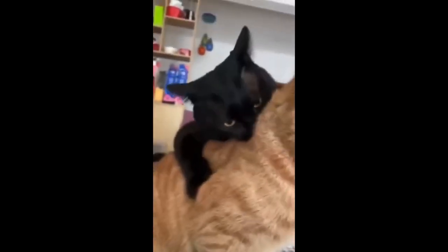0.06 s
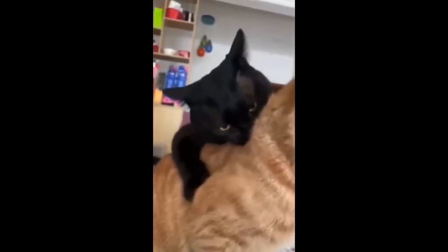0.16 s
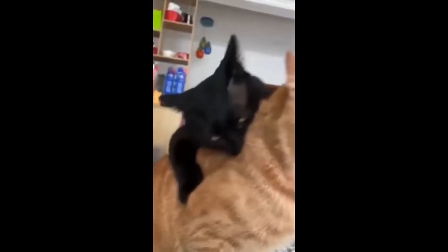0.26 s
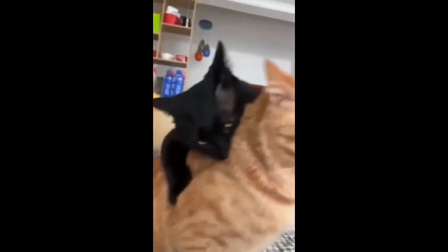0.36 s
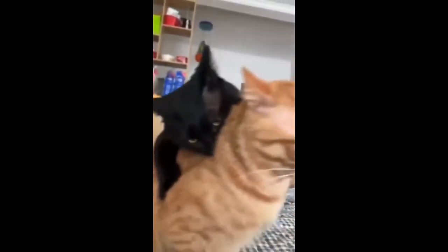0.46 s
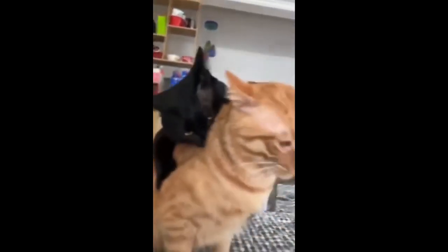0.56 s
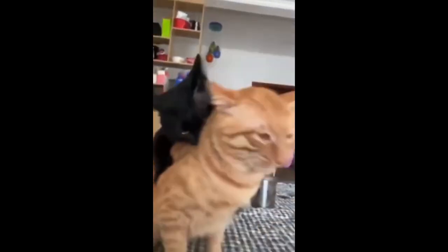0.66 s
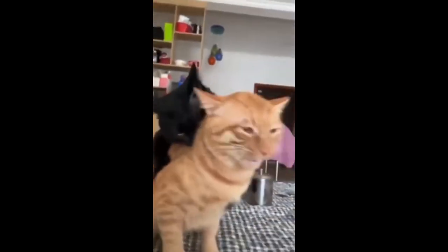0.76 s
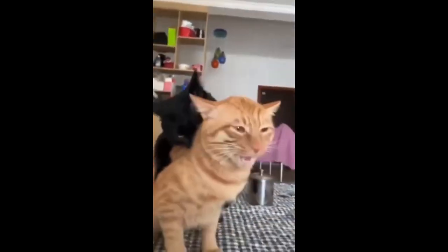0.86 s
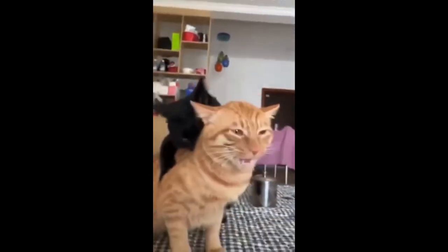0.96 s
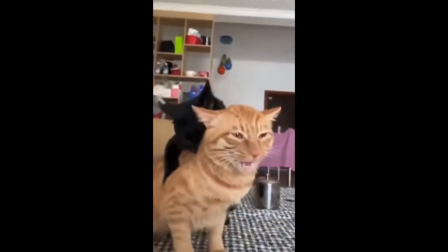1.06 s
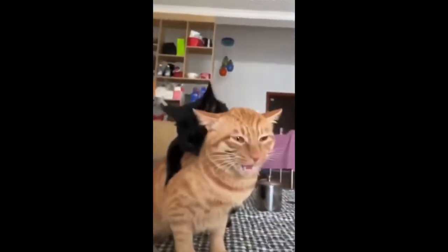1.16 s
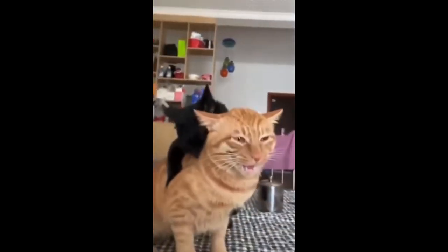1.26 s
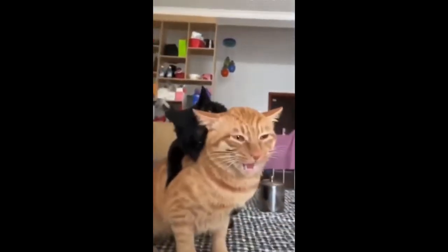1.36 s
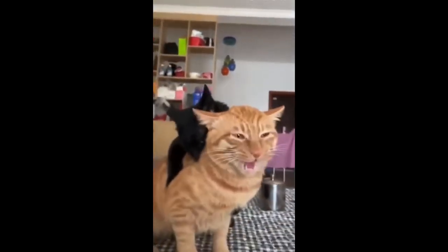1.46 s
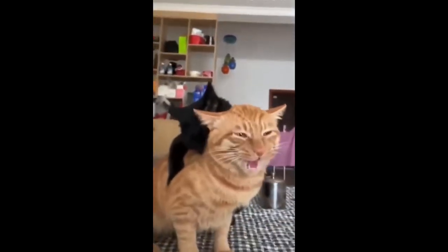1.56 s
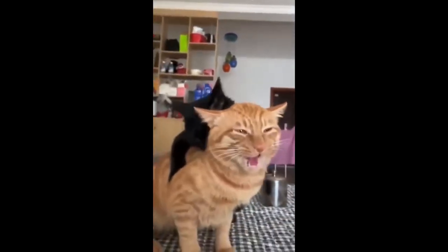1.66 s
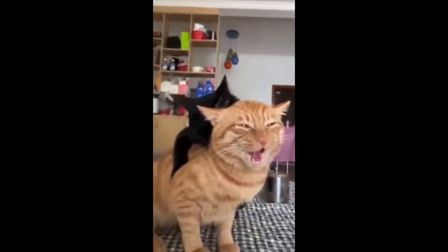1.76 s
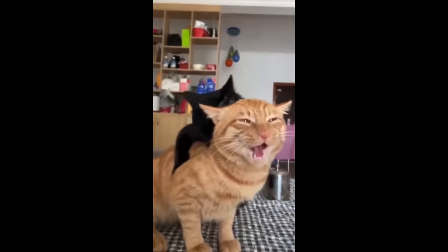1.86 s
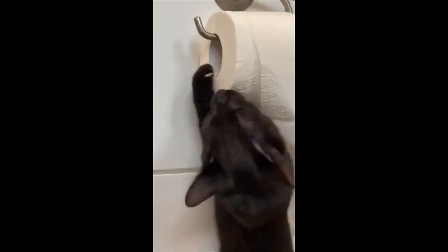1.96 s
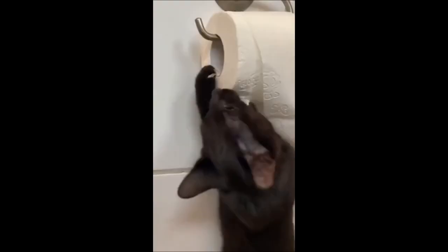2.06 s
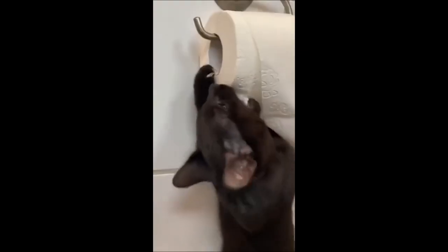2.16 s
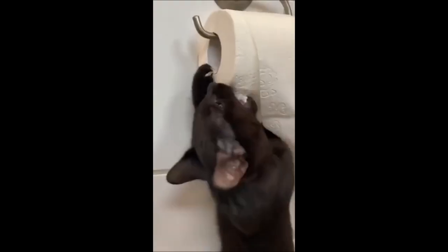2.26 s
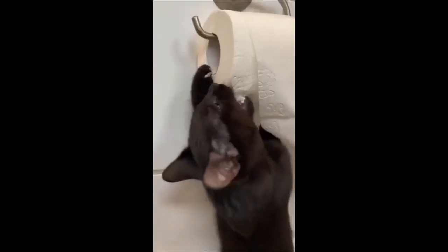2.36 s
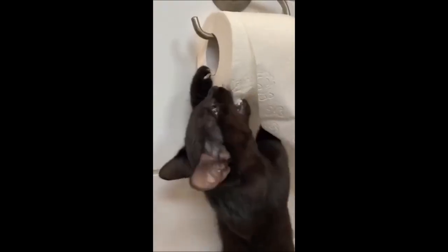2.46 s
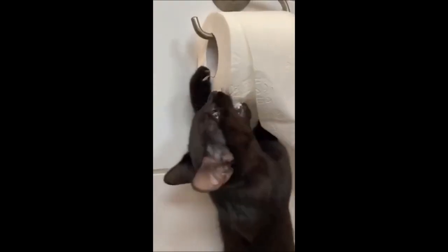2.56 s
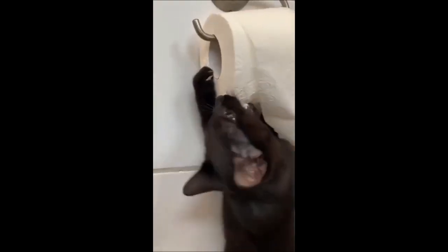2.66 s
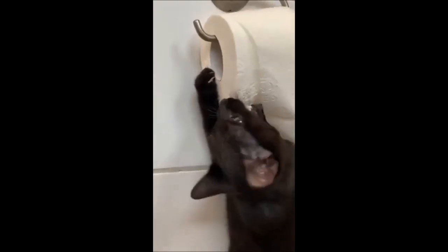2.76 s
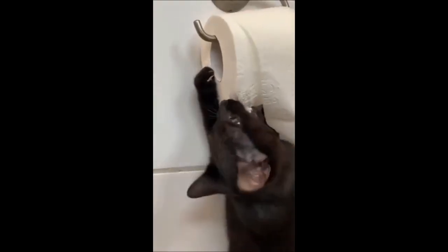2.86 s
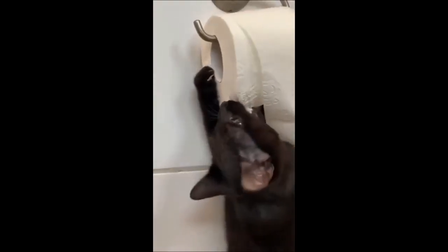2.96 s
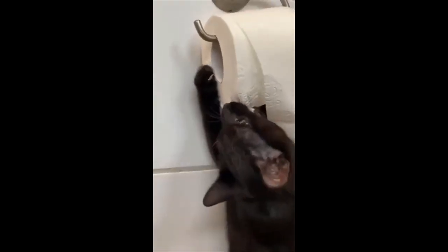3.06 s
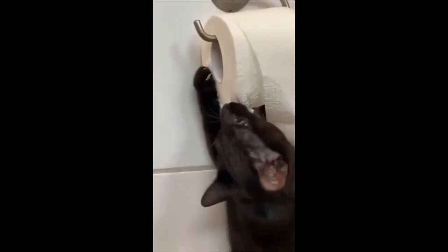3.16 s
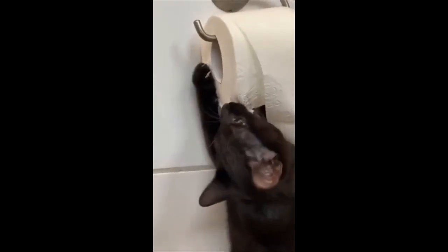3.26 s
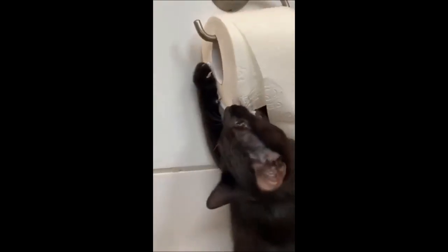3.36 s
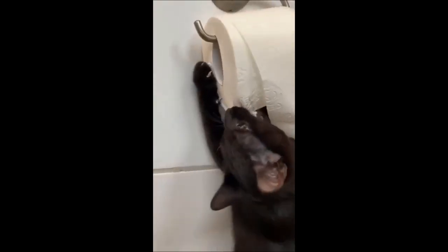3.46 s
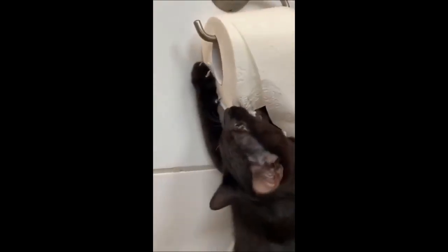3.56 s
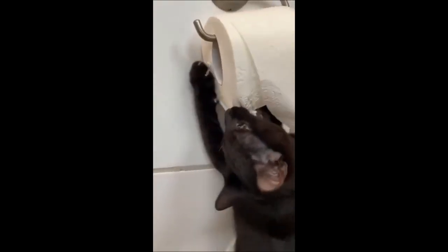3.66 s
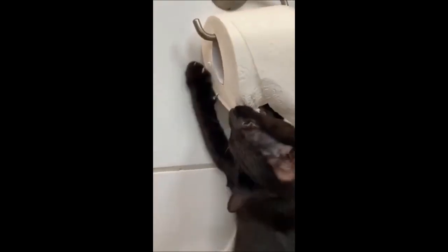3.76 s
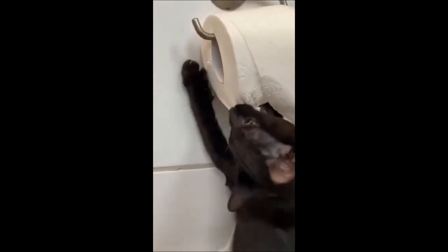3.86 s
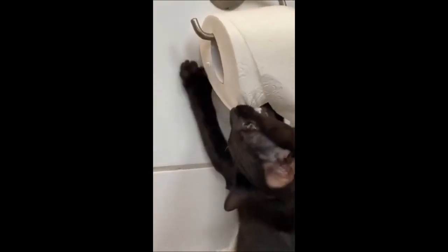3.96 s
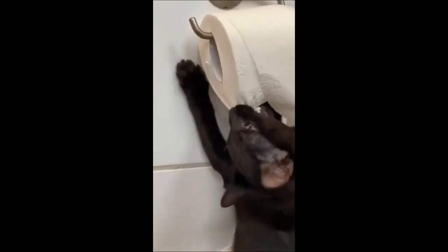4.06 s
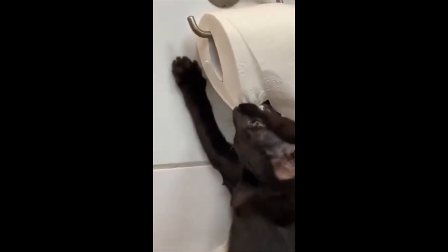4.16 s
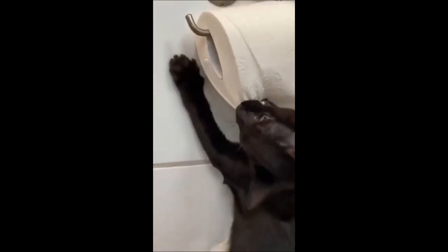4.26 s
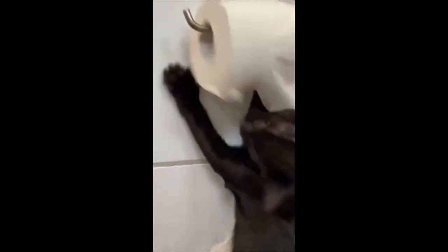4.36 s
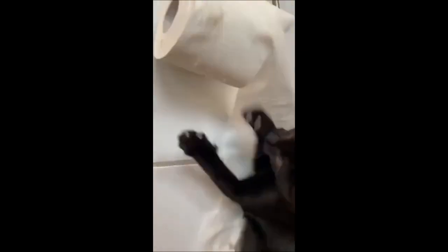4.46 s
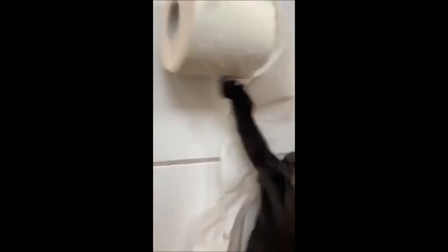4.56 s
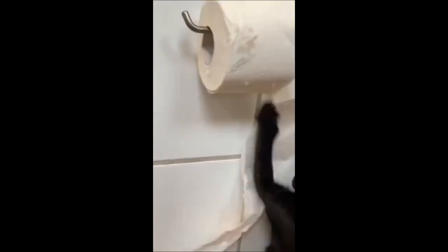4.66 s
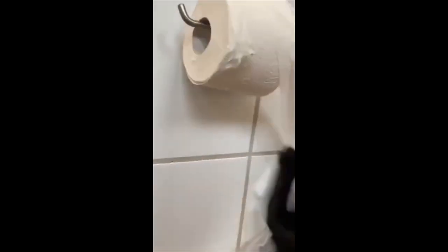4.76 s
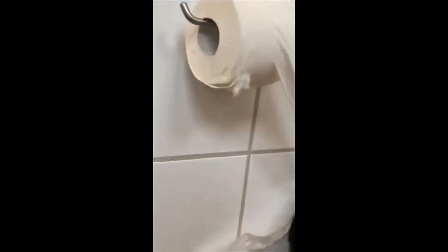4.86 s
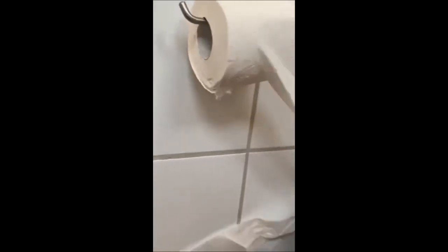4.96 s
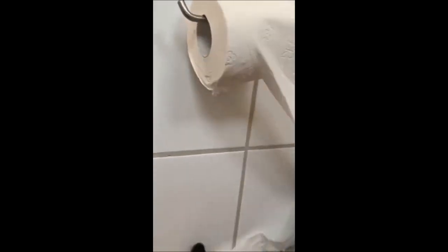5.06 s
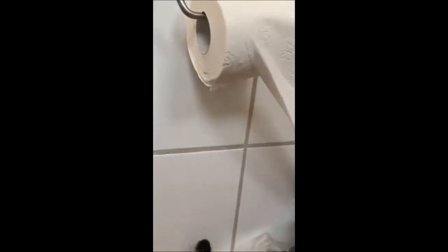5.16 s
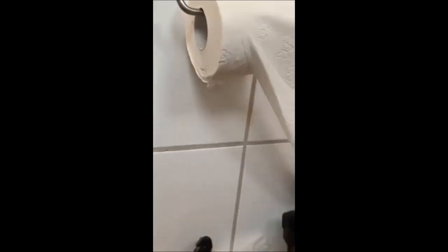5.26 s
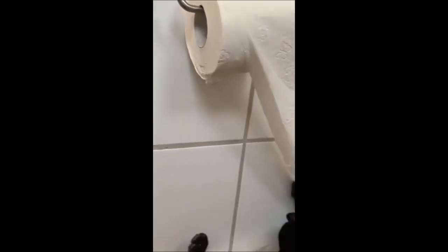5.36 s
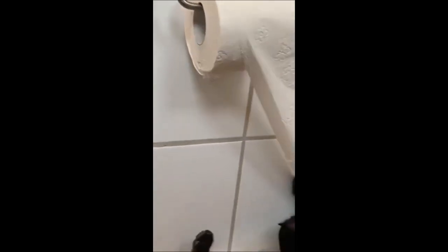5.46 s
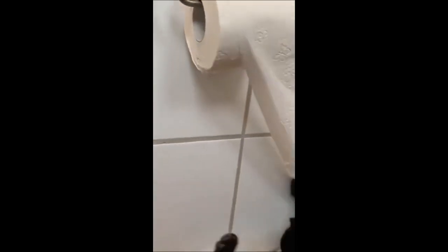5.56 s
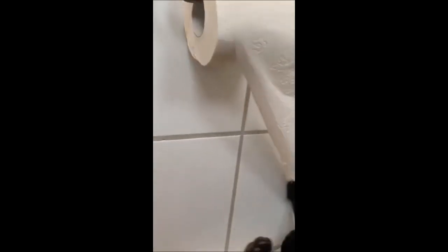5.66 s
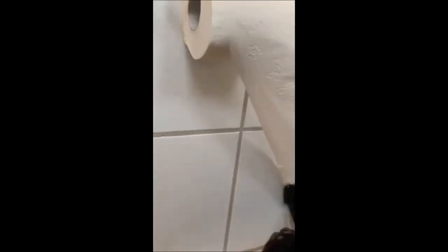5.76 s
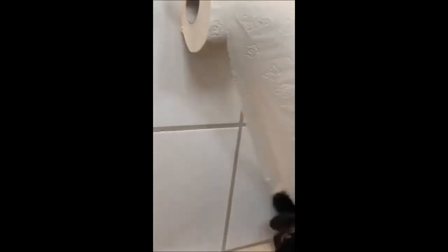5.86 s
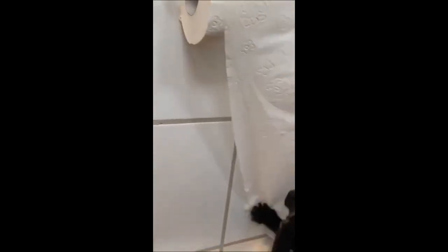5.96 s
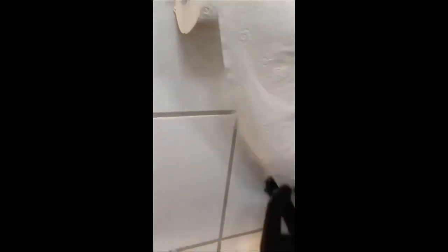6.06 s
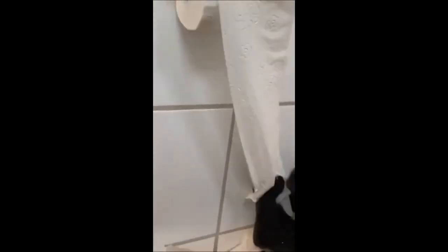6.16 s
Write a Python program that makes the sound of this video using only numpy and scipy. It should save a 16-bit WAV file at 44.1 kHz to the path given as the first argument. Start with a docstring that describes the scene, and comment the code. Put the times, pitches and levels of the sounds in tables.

```python
"""A living room on one microphone: over the room noise come small wet clicks, likely a cat's tongue,
and faint low tones. The cat yowls, vocal folds sounding through a moving mouth, rough at first and
rising in pitch, until the sound breaks off at two seconds. Then a small tiled bathroom on a close pair:
near the microphones a kitten gnaws a toilet roll and knocks it about, so that roll and holder ring,
and drags the soft paper down with a rustle, swishes and bright crinkles. The tiles answer the knocks."""
import sys
import numpy as np
from scipy import signal
from scipy.fft import rfft, irfft, next_fast_len
from scipy.io import wavfile

SR = 44100
rng = np.random.default_rng(int(sys.argv[2]) if len(sys.argv) > 2 else 0)


def generate_wav(signal):
    """Clip the signal to [-1, 1] and save it as 16-bit WAV at the path in sys.argv[1]."""
    frames = np.transpose(np.atleast_2d(signal))
    scaled = np.clip(frames, -1, 1) * 32767
    pcm = np.round(scaled).astype(np.int16)
    wavfile.write(sys.argv[1], SR, pcm)


N = 273420
T, HZ = np.arange(N) / SR, np.arange(N // 2 + 1) * SR / N + 1

# living-room noise spectrum: freq_hz, density_db
ROOM_SPECTRUM = [(12, -37), (20, -8), (102, 1.5), (344, -13), (416, -15.5), (625, -22), (1230, -19),
                 (2360, -31), (5770, -36.5), (6600, -47), (13000, -49)]
# wet clicks: start_s, level_db, t60_s, low_cavity_offset_db
CLICKS = [(0.219, -38, 0.035, -8), (0.625, -50, 0.16, 8), (0.7572, -24.5, 0.0095, 1.5),
          (0.7847, -28, 0.012, -0.5), (1.112, -25.5, 0.0052, -18), (1.4076, -23, 0.0089, 6),
          (1.4418, -23.5, 0.013, 2.5), (1.586, -17, 0.02, -1.5)]
# the low and high cavity of a click: freq_hz, base_width_hz, gain_db
CAVITIES = [(2230, 1400, -10), (5450, 760, -5)]
# faint low tones: start_s, end_s, pitch_hz, level_db
LOW_TONES = [(0.46, 0.703, 414, -65), (0.913, 1.26, 223.2, -54)]
# course of the yowl: time_s, pitch_hz, level_db, low_resonance_hz, high_resonance_hz, high_over_low_db
YOWL_PATH = [(.755, 351.8, -54, 990, 1500, -1), (.77, 352, -48, 940, 1450, -5.5),
             (.804, 357.5, -38.5, 860, 1500, -13), (.82, 383.3, -33, 750, 1490, 8),
             (.9, 394.4, -30, 870, 1600, 2), (.93, 408.7, -32.5, 830, 1790, 4),
             (1.03, 425.2, -33, 864, 1970, 5.5), (1.16, 452.2, -35.5, 1016, 2090, -7),
             (1.4, 458, -35, 1160, 2210, -26.5), (1.46, 467.6, -39.5, 980, 2340, 2.5),
             (1.6, 490, -43.5, 1046, 2300, -5.5), (1.84, 508, -36.5, 1134, 2100, -8),
             (1.885, 532.2, -24, 1284, 2106, -1.5), (1.926, 516, -23.5, 1299, 2020, -6.5),
             (1.965, 490, -25.5, 1205, 2200, -5), (2.011, 476, -24.5, 1164, 2200, -4)]
# the voice catches or surges: centre_s, change_db, half_length_s
VOICE_CATCHES = [(0.8, -5.5, 0.012), (0.876, -5.5, .012), (0.919, -6.5, .014), (1.43, -11.5, 0.024),
                 (1.48, -7, 0.011), (1.592, -2.5, 0.017), (1.69, 4.5, .02), (1.733, 5, .018),
                 (1.799, 5, 0.021), (1.979, -4, 0.0305)]
# throat spectrum under the mouth resonances: freq_hz, gain_db
THROAT_SPECTRUM = [(300, -45), (700, -45), (1800, -9.5), (2300, -1), (2900, -26.5), (3600, -29),
                   (4600, -37), (5500, -25.5), (7000, -72.5)]
# breath in the call, with the recorder's treble gap at 7-8.6 kHz: freq_hz, density_db
BREATH_SPECTRUM = [(1800, -38), (2700, -8), (3400, -9), (5500, -1), (6600, -8), (7100, -49.5),
                   (8600, -31.5), (9500, -13.5), (14000, -25)]
# left-right likeness of diffuse sound at the pair: freq_hz, correlation
PAIR_LIKENESS = [(90, 0.99), (170, 0.66), (300, 0.45), (700, 0.029), (2000, 0.12), (13000, 0.41)]
# paper in motion: time_s, rustle_db, hiss_db
PAPER_LEVELS = [(2.05, -61.5, -73.5), (2.27, -71, -78), (2.42, -62.5, -72), (2.66, -67, -70),
                (3.1, -64, -76), (3.4, -70.5, -75), (3.75, -82, -75.5), (3.83, -59, -55), (4.05, -56, -58),
                (4.19, -65.5, -68.5), (4.44, -58, -65), (4.5, -40.5, -45), (4.56, -43.5, -49.5),
                (4.66, -48.5, -55), (4.75, -47.5, -48), (4.82, -44, -46), (4.98, -46, -46),
                (5.06, -58, -61), (5.18, -64, -62.5), (5.44, -63, -68.5), (6.2, -64, -64.5)]
# dull rustle of the paper: freq_hz, density_db
RUSTLE_SPECTRUM = [(200, -6), (420, 0), (700, -5), (1080, -1), (1300, -4), (1550, -4.5), (2300, -10.5),
                   (4000, -36.5)]
# bright hiss of the paper: freq_hz, density_db
HISS_SPECTRUM = [(1200, -13), (2200, 1.5), (3700, 0), (5000, -5.5), (7500, -2), (10000, -1), (12500, -8),
                 (13500, -28)]
# boom of moving air: freq_hz, density_db
AIR_SPECTRUM = [(20, -31), (45, -13), (66, 1.5), (95, -3.5), (150, -23), (230, -6), (400, -10), (600, -58)]
# swishes of the sheet: centre_s, peak_db, half_length_s
SHEET_SWISHES = [(2.307, -64.5, 0.059), (2.773, -71, 0.18), (3.186, -71, 0.17), (3.501, -65.5, 0.14),
                 (3.67, -55, 0.16), (5.475, -49.5, 0.035), (5.743, -61, 0.038), (5.836, -64, 0.03),
                 (5.907, -69, 0.31), (6.043, -50.5, 0.058), (6.2, -48, 0.026)]
# blows on the roll: start_s, level_db, thump_offset_db, crackle_offset_db
BLOWS = [(2.309, -48, -34, -17), (2.35, -44.5, -47, -25), (2.567, -39.5, -18.5, -31),
         (2.861, -48, -14.5, -15), (2.906, -50, -13, -27), (2.974, -45, -9, 0), (3.051, -50.5, -5.5, -28),
         (3.147, -48.5, -13.5, 6), (3.197, -42, 1, 10.5), (3.276, -60, -22.5, 9), (3.36, -51.5, -9, -28),
         (3.658, -39, -18, -17), (3.8, -27.5, -37, -2), (3.808, -24.5, -16.5, -3), (3.885, -27, -14.5, -2),
         (3.956, -28, -12.5, -2.5), (3.97, -51, -7, -13), (4.003, -22.5, -18, -2), (4.138, -47, -21, -10),
         (4.222, -40.5, -20, -5), (4.308, -37.5, -25, -1.5), (4.376, -49.5, -4, -16),
         (4.449, -33, -16, -24), (4.4567, -8, -23, -38), (4.47, -17, -9.5, -1.5),
         (4.4863, -17.5, -11.5, -34), (4.501, -29, -17, -24), (4.52, -26.5, -30, -15),
         (4.682, -32, -27, -2.5), (4.713, -27.5, -13.5, 4.5), (4.764, -29.5, -7, -15),
         (4.779, -16.5, -20, -1), (4.806, -25, -35, 2), (4.893, -21, -20, 1.5), (5.234, -47.5, -17.5, -14),
         (5.353, -57, -5, -18)]
# resonances of the wound paper: freq_hz, base_width_hz, gain_db
ROLL_MODES = [(878, 73, 3.5), (1160, 107.5, 2.5), (1426, 49, 4), (1878, 16, -6), (2090, 57, -7.5)]
# resonances of wall, holder and hollow tube: freq_hz, base_width_hz, gain_db
HOLDER_MODES = [(81.5, 16.5, -4.5), (236, 56, -1.5), (437, 27, -1), (552, 135, 1)]
# balance of near blows at the pair: freq_hz, left_over_right_db
PAIR_BALANCE = [(70, 3), (200, -10.5), (520, 0), (1400, 5), (3000, 0)]
# phase of near blows at the pair: freq_hz, left_lead_rad
PAIR_PHASE = [(120, 0.15), (300, 0.24), (700, 1.22), (4100, 1.3)]
# bright crinkles of the sheet: start_s, length_s, level_db
SHEET_CRINKLES = [(3.778, 0.003, -64), (3.91, .012, -53), (3.9415, 0.0067, -51), (3.965, 0.011, -53),
                  (4.083, 0.0091, -61), (4.1221, .004, -52), (4.1405, 0.0032, -57), (4.3386, .013, -59),
                  (4.679, .013, -40.5), (4.786, 0.019, -43), (4.823, 0.022, -47), (4.87, 0.012, -38.5),
                  (4.894, 0.029, -38), (4.966, 0.028, -44), (5.008, 0.0071, -46)]

MOUTH_WIDTHS_HZ = (1010, 660)   # low and high resonance
PATCH_EDGES_HZ = (0, 3500, 5500, 8000, 10500, 22050)   # bands of hiss that flicker separately
BREAK_S, RESUME_S = 2.0105, 2.034   # the living room ends, the bathroom begins
ROOM_NOISE_DB, STILL_AIR_DB = -54.5, -79
ROUGH_LEAST, ONSET_ROUGH, SETTLE_S = .05, .09, .15   # the call starts rough and settles
ROUGH_BELOW_DB, ROUGH_PER_DB = -35, .032   # a weak voice turns rough
# in a catch the voice rasps, the pitch sags and the high resonance stands out
CATCH_ROUGH_PER_DB, SAG_HZ_PER_DB, CATCH_HIGH_PER_DB = .028, 4, .4
BREATH_LEAST, BREATH_PER_ROUGH, BREATH_RISE_DB_PER_S = .009, .1, 5
SWISH_FALL_DB, SWISH_DULL_DB = 28.5, -1.5   # fall over a half length; the rustle's part
KNOCK_T60_S, T60_DB_PER_DB = .066, -.0332   # contact noise of a -23.5 dB blow; soft blows drag on longer
THUMP_T60_S = .083
CRINKLE_BAND_HZ = (7200, 11300)
PAIR_CUTOFF_HZ, CUTOFF_HZ = 13700, 14800


def amp(db):
    """Decibels to gain."""
    return 10 ** (np.asarray(db) / 20)


def rms_one(x):
    """Scale to unit rms."""
    return x / np.sqrt(np.mean(x ** 2) + 1e-20)


def in_time(rows):
    """Columns of a table, joined by straight lines in time."""
    s, *columns = np.transpose(rows)
    return [np.interp(T, s, c) for c in columns]


def at_hz(points, hz):
    """A spectrum read on a log-frequency axis."""
    f, v = np.transpose(points)
    return np.interp(np.log(hz), np.log(f), v)


def butter(x, hz, kind):
    """A gentle Butterworth filter."""
    return signal.sosfilt(signal.butter(2, hz, kind, fs=SR, output="sos"), x)


def coloured(spectrum):
    """Steady one-channel noise of unit rms."""
    return rms_one(irfft(rfft(rng.standard_normal(N)) * amp(at_hz(spectrum, HZ)), N))


def drift(rate_hz):
    """Random wander of unit rms, mostly slower than rate_hz."""
    return rms_one(irfft(rfft(rng.standard_normal(N)) / (1 + (HZ / rate_hz) ** 4), N))


def grains(spread_db):
    """Noise whose samples have very uneven sizes: many small fibre snaps, a few large."""
    return rms_one(rng.standard_normal(N) * amp(spread_db * np.minimum(rng.exponential(1, N), 5)))


def diffuse(spectrum):
    """Grainy coloured noise at the pair, alike in the bass and looser above."""
    alike = np.clip(at_hz(PAIR_LIKENESS, HZ), -1, 1)
    mid, side = rfft(grains(2.5)), rfft(grains(2.5))
    pair = np.sqrt(1 + alike) * mid + np.sqrt(1 - alike) * side * [[1], [-1]]
    return rms_one(irfft(pair * amp(at_hz(spectrum, HZ)), N))


def resonate(x, peaks, widen):
    """Parallel resonances of alternating sign, each base width multiplied by widen."""
    out = 0
    for k, (hz, width, db) in enumerate(peaks):
        r = np.exp(-np.pi * width * widen / SR)
        feedback = [1, -2 * r * np.cos(2 * np.pi * hz / SR), r * r]
        out = out + (-1) ** k * amp(db) * signal.lfilter([1 - r * r, 0, r * r - 1], feedback, x)
    return out


def reverb(x, t60_s, lags_s, wall_hz):
    """Twelve feedback delays a side; t60_s holds at half wall_hz, and the walls swallow treble faster."""
    size = next_fast_len(N + SR // 2)
    hz = np.arange(size // 2 + 1) * SR / size
    out = np.zeros((2, len(hz)), complex)
    for k, lag in enumerate(rng.uniform(*lags_s, 24)):
        loop = amp(-60 * lag / t60_s * (.5 + hz / wall_hz)) * np.exp(-2j * np.pi * hz * lag)
        out[k % 2] += (-1) ** (k // 2) * loop / (1 - loop)
    return irfft(out * rfft(x, size), size)[:, :N]


def bursts(times, levels_db, t60s, rise_s):
    """Envelope of contacts: a quick rise, then an exponential fall."""
    out = np.zeros(N)
    for s, db, t60 in zip(times, levels_db, t60s):
        i = int(s * SR)
        t = T[:min(SR // 4, N - i)]
        out[i:i + len(t)] += amp(db - 60 * t / max(t60, .003)) * np.minimum(t / rise_s, 1)
    return out


def room_noise():
    """The steady, bass-heavy background of the living room."""
    return amp(ROOM_NOISE_DB) * coloured(ROOM_SPECTRUM)


def wet_clicks():
    """Each click is a tiny noise burst ringing in two broad cavities; the recorder drops 7-9 kHz."""
    s, db, t60, low_db = np.transpose(CLICKS)
    noise = rng.standard_normal(N)
    low = resonate(noise * bursts(s, db + low_db, t60, rise_s=.00019), [CAVITIES[0]], widen=.66)
    high = resonate(noise * bursts(s, db, t60, rise_s=.00028), [CAVITIES[1]], widen=.77)
    return butter(high - low, [6900, 9000], "bandstop")


def low_tones():
    """Soft sines that swell and fade."""
    out = 0
    for start, end, hz, db in LOW_TONES:
        swell = np.sin(np.pi * np.clip((T - start) / (end - start), 0, 1)) ** .5
        out = out + amp(db) * swell * np.sin(2 * np.pi * hz * T)
    return out


def yowl():
    """Harmonics of the vocal folds through two moving mouth resonances, with breath pulsed each cycle."""
    pitch, db, low_hz, high_hz, high_db = in_time(YOWL_PATH)
    start_s = YOWL_PATH[0][0]
    on = slice(int(start_s * SR), int(BREAK_S * SR))
    catch_db = sum(change * np.clip(1 - abs(T - s) / half, 0, 1) for s, change, half in VOICE_CATCHES)
    onset_rough = ONSET_ROUGH * np.exp(-abs(T - start_s) / SETTLE_S)
    weak_rough = ROUGH_PER_DB * np.maximum(ROUGH_BELOW_DB - db, 0)
    rough = np.clip(ROUGH_LEAST + onset_rough + weak_rough - CATCH_ROUGH_PER_DB * catch_db, 0, 1)
    pitch += SAG_HZ_PER_DB * catch_db
    db += catch_db
    high_db -= CATCH_HIGH_PER_DB * catch_db
    effort_db = .5 * (db[on] + 21)   # a louder call is brighter and less breathy

    wobble = (.003 + .05 * np.minimum(rough, .25)) * drift(40)   # unsteady throat muscles
    waver = drift(20)   # each harmonic swells and fades on its own, as in a reflecting room
    jitter = .071 * rough ** 2 * drift(120)   # irregular cycles where the voice cracks
    phase = (2 * np.pi * np.cumsum(pitch * (1 + wobble + jitter)) / SR)[on]
    tone, power = 0, 0
    for k in range(1, 19):
        hz = k * pitch[on]
        low = 1 / (1 + (2 * (hz - low_hz[on]) / MOUTH_WIDTHS_HZ[0]) ** 2) ** 2
        high = amp(high_db[on]) / (1 + (2 * (hz - high_hz[on]) / MOUTH_WIDTHS_HZ[1]) ** 2) ** 2
        throat = amp(at_hz(THROAT_SPECTRUM, hz) + .9 * effort_db + 7)
        waver_db = (.6 + .3 * k + 8 * np.minimum(rough[on], .3)) * np.roll(waver, k * 9000)[on]
        gain = (low + high + throat) * amp(waver_db)
        tone = tone + gain * np.sin(k * phase + .21 * k * k)
        power = power + gain ** 2 / 2

    flutter = amp(1.9 * drift(20)) * (1 + 1.1 * rough * np.tanh(drift(120)))   # the folds close unevenly
    breath_db = BREATH_RISE_DB_PER_S * (T[on] - T[on][0]) - .5 * effort_db
    breath_share = (BREATH_LEAST + BREATH_PER_ROUGH * rough[on]) * amp(breath_db)
    breath = breath_share * coloured(BREATH_SPECTRUM)[on] * (1 + .5 * np.cos(phase))
    out = np.zeros(N)
    out[on] = tone / np.sqrt(power) + breath
    return out * flutter * amp(db)


def living_room():
    """The cat and its room on one microphone, cut off sharply."""
    cat = yowl() + wet_clicks()
    background = room_noise() + low_tones()
    walls = amp(-30) * reverb(cat, t60_s=.3, lags_s=(.012, .04), wall_hz=4000)[0]
    return (cat + walls + background) * (T < BREAK_S)


def paper_drag():
    """Soft tissue dragging: a dull rustle, a hiss that flickers in patches, and the air it moves."""
    rustle_db, hiss_db = in_time(PAPER_LEVELS)
    swish = swishes()
    clump = drift(6)   # fibres give way in clumps
    crease_db = 3.5 * np.maximum(drift(45) - .7, 0)   # creases snap for a few milliseconds
    rustle_gain = (amp(rustle_db) + amp(SWISH_DULL_DB) * swish) * amp(2 * clump + .5 * crease_db)
    hiss_gain = (amp(hiss_db) + swish) * amp(1.3 * clump + crease_db)
    rustle = diffuse(RUSTLE_SPECTRUM)
    hiss_bins, hiss = rfft(diffuse(HISS_SPECTRUM)), 0
    for low, high in zip(PATCH_EDGES_HZ, PATCH_EDGES_HZ[1:]):
        flicker = amp(2.5 * drift(45) + 2.2 * drift(10))
        hiss = hiss + flicker * irfft(hiss_bins * ((HZ > low) & (HZ <= high)), N)
    return rustle_gain * rustle + hiss_gain * hiss + moving_air(rustle_db)


def moving_air(rustle_db):
    """A low boom that swells with the rustle; only hard pulls move much air."""
    return (amp(STILL_AIR_DB) + amp(1.408 * rustle_db + 22)) * diffuse(AIR_SPECTRUM)


def swishes():
    """Envelope of the sheet's swishes: each swells and fades evenly in dB."""
    return sum(amp(db - SWISH_FALL_DB * abs(T - s) / half) for s, db, half in SHEET_SWISHES)


def knocks():
    """A sharp first contact and uneven contact noise drive the roll, the holder and a paper crackle."""
    s, db, thump_db, crackle_db = np.transpose(BLOWS)
    t60 = KNOCK_T60_S * amp(T60_DB_PER_DB * (db + 23.5))
    first_contact = bursts(s, db + 9.5, t60 * .049, rise_s=.00062)
    contact_noise = grains(4.75) * bursts(s, db + 1, t60, rise_s=.00066)
    roll = resonate(first_contact + contact_noise, ROLL_MODES, widen=3.85)
    thump = grains(2.6) * bursts(s, db + thump_db + 15.5, np.full(len(s), THUMP_T60_S), rise_s=.0017)
    holder = resonate(thump, HOLDER_MODES, widen=1.02)
    # snaps are spread over the sheet, so they differ at the two microphones
    snaps = [grains(12), grains(4.5)] * bursts(s, db + crackle_db - 10.5, t60 * 1.36, rise_s=.0012)
    crackle = butter(snaps + .17 * snaps[::-1], [2600, 11500], "band")
    return roll + crackle + holder


def crinkles():
    """Bright runs of fibre snaps that start and stop at once, partly alike at the two microphones."""
    gate = sum(amp(db) * np.clip(np.minimum(T - s, s + length - T) / .002, 0, 1)
               for s, length, db in SHEET_CRINKLES)
    snaps = np.array([grains(5.7), grains(5)])
    return gate * rms_one(butter(snaps + .5 * snaps[::-1], CRINKLE_BAND_HZ, "band"))


def bathroom():
    """Paper and near blows on the close pair; blows arrive unequal in colour and phase, tiles answer."""
    near = knocks()
    tilt = amp(at_hz(PAIR_BALANCE, HZ) / 2) * np.exp(.5j * at_hz(PAIR_PHASE, HZ))
    direct = irfft(rfft(near) * [tilt, 1 / tilt], N)
    above_bass = butter(near.mean(axis=0), 300, "high")   # bass stays alike at both microphones
    tiles = amp(-19) * reverb(above_bass, t60_s=.27, lags_s=(.006, .03), wall_hz=4600)
    fade_in = np.clip((T - RESUME_S) / .075, 0, 1)
    pair = (direct + tiles + paper_drag() + crinkles()) * fade_in
    return signal.sosfilt(signal.cheby2(8, 30, PAIR_CUTOFF_HZ, fs=SR, output="sos"), pair)


def scene():
    """The two places, one after the other."""
    return living_room() + bathroom()


def record(dry):
    """The top treble is cut steeply, 70 dB down at the cutoff."""
    return signal.sosfilt(signal.cheby2(12, 70, CUTOFF_HZ, fs=SR, output="sos"), dry)


dry = scene()
out = record(dry)
generate_wav(out)
```